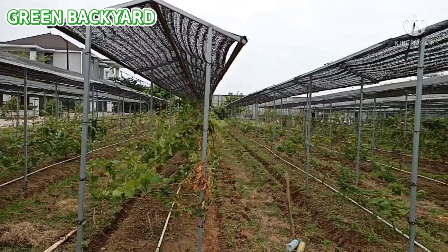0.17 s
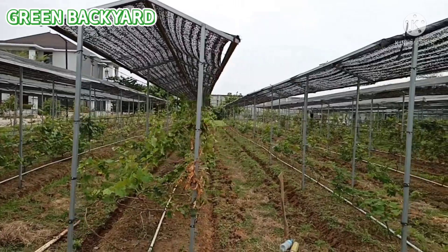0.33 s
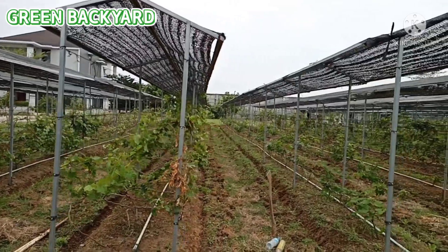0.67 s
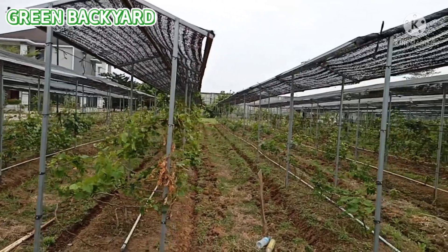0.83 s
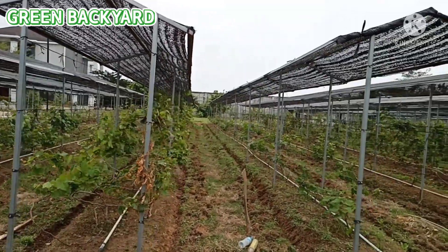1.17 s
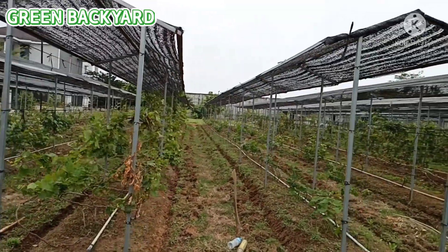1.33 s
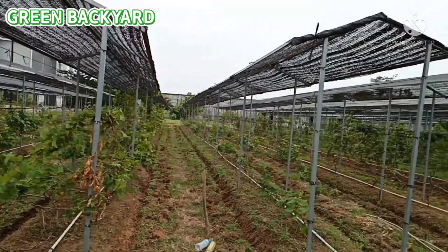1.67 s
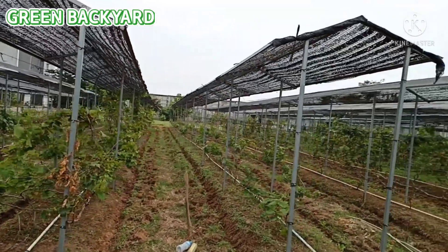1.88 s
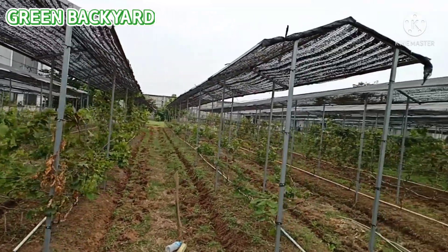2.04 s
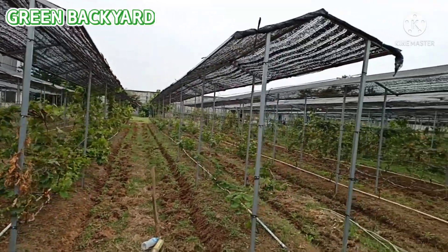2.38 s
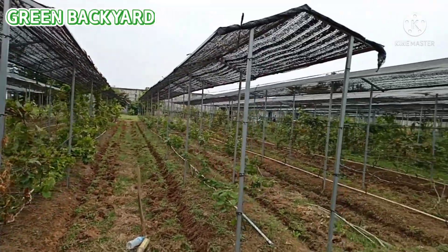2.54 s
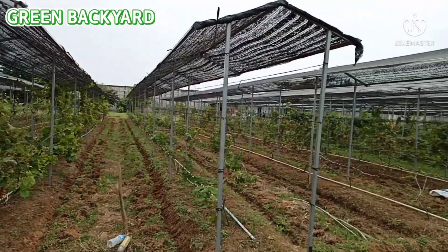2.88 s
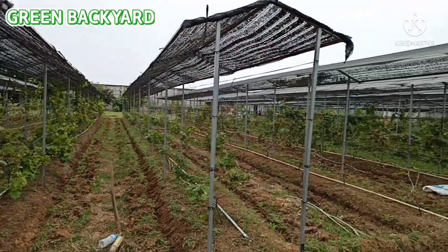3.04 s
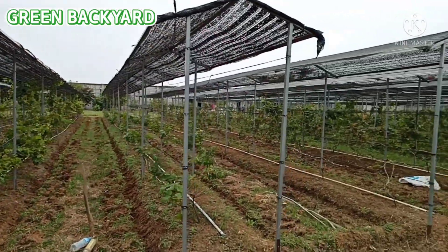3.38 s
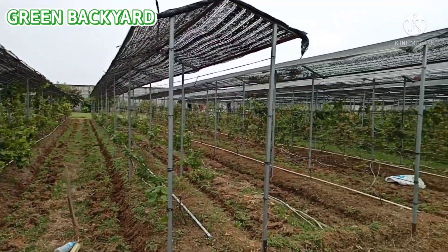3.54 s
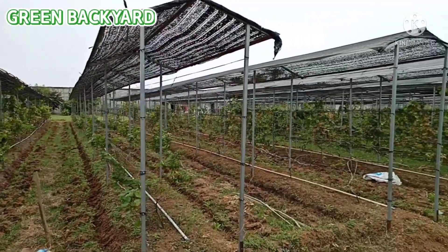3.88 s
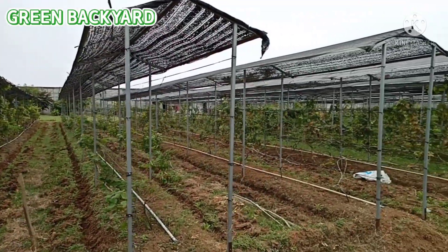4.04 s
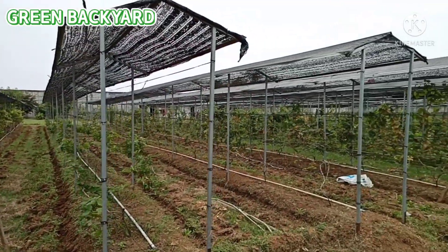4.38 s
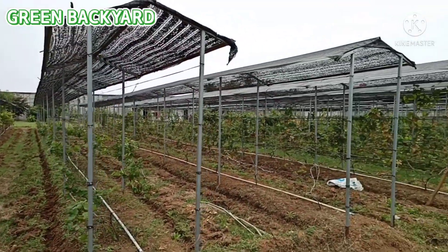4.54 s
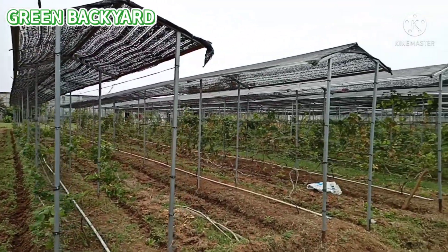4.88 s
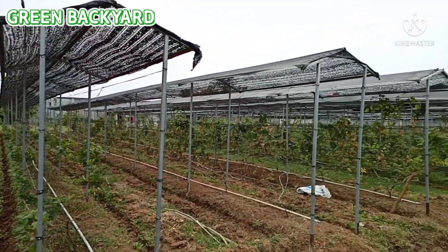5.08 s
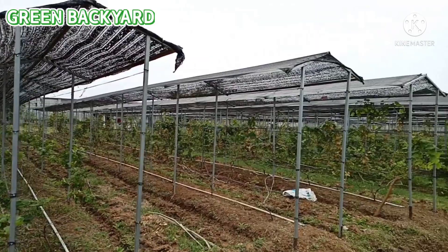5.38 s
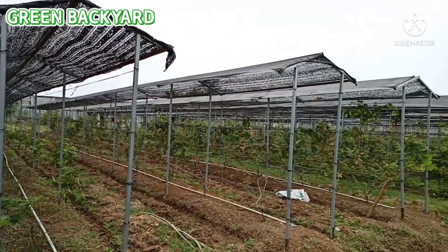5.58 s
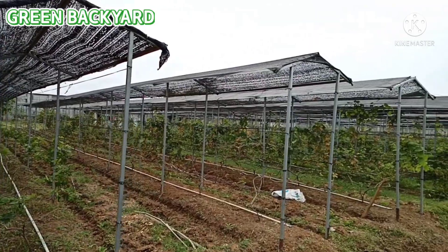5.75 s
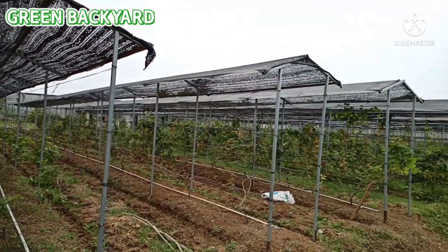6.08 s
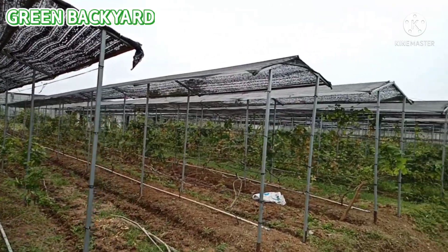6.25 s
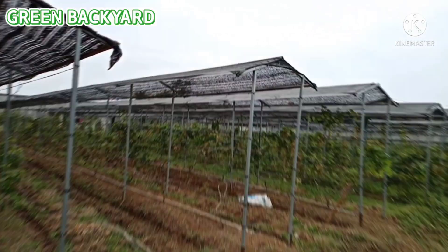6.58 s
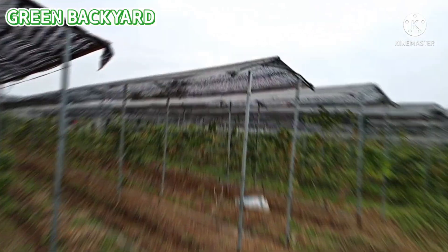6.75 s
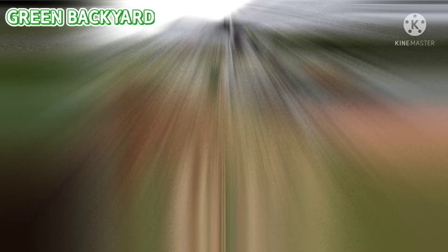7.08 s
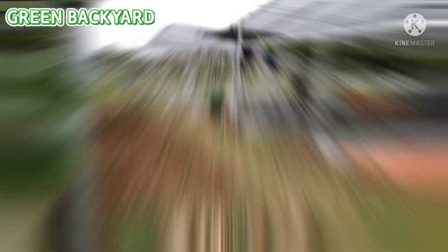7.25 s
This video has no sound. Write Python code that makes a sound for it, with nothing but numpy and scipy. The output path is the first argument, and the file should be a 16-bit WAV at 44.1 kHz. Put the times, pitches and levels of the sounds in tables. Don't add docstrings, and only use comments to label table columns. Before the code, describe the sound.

A pure, gliding bird whistle stands out over quiet open air: one three-note phrase early, another past the middle, then a rapid, softer chatter. Between them a distant bird chirps evenly, with slurred calls and brief finger ticks on the device case. Low bumps open the scene. Everything sits near the centre, with a blurred outdoor echo, light hiss and a very faint steady motor buzz.

```python
import sys
import numpy as np
from scipy import signal
from scipy.fft import rfft, irfft, next_fast_len
from scipy.io import wavfile
from scipy.ndimage import uniform_filter1d

SR = 44100
rng = np.random.default_rng(int(sys.argv[2]) if len(sys.argv) > 2 else 0)


def gain_from_db(level_db):
    decades = np.asarray(level_db, float) / 20
    return 10 ** decades


def dump_mix(stems):
    frames = np.atleast_2d(stems).T
    limited = np.clip(frames, -1, 1)
    pcm = np.round(limited * 32767).astype(np.int16)
    wavfile.write(sys.argv[1], SR, pcm)


N = 327222

# time in seconds, pitch in Hz, level in dB.
OPENERS = [
    [(0.39, 2175, -71), (0.42, 2446, -35.5), (0.486, 2650, -29.5), (0.496, 2648, -20.5),
     (0.542, 2857, -29.5), (0.552, 2761, -21), (0.69, 3048, -26.5)],
    [(4.69, 3120, -46), (4.712, 3637, -28.5), (4.78, 3512, -23.5), (4.786, 3446, -38.5), (4.862, 3449, -17),
     (4.93, 3260, -50)],
]
# start in seconds, fall in seconds, climb in seconds, lowest Hz, top Hz.
DIPS = [
    (.94, .062, .098, 1667, 1978),
    (5.04, .08, .055, 1618, 2080),
]
# start in seconds, length in seconds, pitch in Hz, drift in Hz per second, level in dB.
HELD_NOTES = [
    (1.322, 0.11, 2444, -6, -19),
    (5.356, 0.1354, 2556, -1300, -25),
]
# time in seconds, pitch in Hz, level in dB.
CHATTER = [
    [(5.737, 1162, -48), (5.765, 1504, -34.5), (5.775, 1667, -30), (5.79, 1587, -35)],
    [(5.864, 2140, -55), (5.871, 2271, -32.5), (5.886, 2230, -45), (5.896, 1850, -39)],
    [(5.942, 2175, -45), (5.949, 2307, -37.5), (5.966, 2210, -29.5), (5.975, 1710, -40.5),
     (5.99, 1220, -58)],
    [(5.99, 1154, -42), (6.03, 1134, -45), (6.045, 1060, -39)],
]
OVERTONES_DB = [-45, -51, -42.5, -37.5, -47, -40.5, -51, -38, -45, -36]
# frequency in Hz, gain in dB.
BEAK_COLOUR = [(2000, -14), (3500, 18), (4200, -7), (5400, 8.5), (8000, -6), (10000, 6.5), (11500, -4),
               (13000, -10), (15500, -15.5)]
AWAY_DB = [-1, -5, -8, -1.5, -3.5, -1.5, -7.5, 6, 3, -4.5]
# delay in seconds, level in dB.
ECHOES = [(.0063, -9), (.0113, -7), (.0173, -4.5), (.0313, -10), (.047, -15), (.0805, -11)]
# level in dB, swell in seconds, end of near walls in seconds, drop after them in dB, t60 in seconds.
GARDEN_SCATTER = (-7.5, 0.015, 0.085, -6, 1.4)
DISTANCE_SCATTER = (2.5, .002, .19, -2, 1.6)
HEDGE_SCATTER = (2.5, 0.003, .15, -1.5, 0.85)

# start in seconds, level in dB.
CHIRPS = [(1.844, -50), (2.097, -46.5), (2.337, -46.5), (2.585, -46), (2.83, -46), (3.07, -45.5),
          (4.408, -48), (5.545, -49), (7.02, -53.5)]
# seconds after the start, pitch in Hz, level in dB.
CHIRP_PARTS = [
    [(-.006, 3000, 2.5), (.006, 3222, -2.5), (.055, 3293, -11.5)],
    [(.012, 3350, 2.5), (.025, 4067, 1.5), (.045, 4396, 2.5), (.066, 4980, -6), (.09, 5260, -3.5)],
]
# start in seconds, length in seconds, start Hz, end Hz, level in dB.
SLURS = [(.59, 0.046, 3469, 4000, -55), (1.348, 0.077, 7270, 7020, -65), (1.52, 0.026, 4310, 4070, -59.5),
         (1.6, 0.066, 2590, 2976, -62.5), (1.74, .07, 2170, 1814, -57.5), (1.832, 0.043, 2347, 2500, -51.5),
         (2.595, 0.016, 2300, 1970, -56), (2.9, 0.029, 1840, 2130, -50.5), (2.925, 0.01, 850, 770, -55),
         (3.013, 0.033, 1940, 2320, -44.5), (3.034, .075, 2310, 2220, -51.5),
         (3.07, 0.058, 1585, 1785, -57.5), (3.245, .042, 3600, 3010, -48.5),
         (3.259, 0.059, 3093, 2394, -44), (3.332, .038, 2557, 1892, -47), (3.391, 0.047, 2177, 2290, -49),
         (4.758, 0.13, 1890, 2357, -56.5), (4.825, 0.086, 2106, 2690, -55),
         (4.905, 0.059, 3270, 2990, -54.5), (5.996, 0.033, 3550, 2950, -57), (6.83, .19, 3090, 2780, -67.5),
         (7.305, 0.047, 5350, 5300, -67)]
# start in seconds, end pitch in Hz, level in dB.
SEEPS = [
    (1.105, 7120, -59),
    (2.971, 6700, -65.5),
    (4.836, 6470, -60),
    (6.988, 6440, -62),
]

# start in seconds, peak in dB, ring in Hz, fade in seconds, direction of the push.
BUMPS = [
    (.152, -38, 288, 0.0043, 0.99),
    (0.227, -24, 200, 0.00093, -1.3),
    (.249, -35.5, 161, 0.012, -1.36),
    (0.256, -16, 71, 0.01, 0.75),
]
# start in seconds, peak in dB, centre in Hz, width in Hz, length in seconds.
TICKS = [(0.227, -41.5, 900, 2500, 0.00088), (2.322, -34.5, 3500, 8950, .001),
         (2.338, -46, 6500, 6000, 0.00089), (2.354, -45.5, 6500, 8030, .001),
         (2.606, -47.5, 9000, 6060, .001), (3.579, -34, 10000, 12340, 0.0014),
         (3.595, -55, 2200, 3000, 0.00235), (3.5993, -32.5, 1507, 2500, 0.0029),
         (3.6, -39, 11500, 10400, 0.0077), (3.6226, -31, 1570, 3000, 0.00091),
         (3.592, -38.5, 700, 1400, 0.023), (3.626, -30, 1790, 3480, 0.0041)]
# level in dB, centre in Hz, width in Hz.
SCRAPE = (-54, 7500, 11000)

# multiple of the motor rate, level in dB.
PUMP_PARTIALS = [(1, -9.5), (2, -2.5), (3, 0), (4, -7.5), (5, -4), (6, -4), (7, -6.5), (8, -10.5), (9, -10),
                 (10, -7.5), (11, -20.5), (12, -8.5), (13, -4.5), (14, -7), (15, -18), (16, -25.5),
                 (17, -12), (18, -6.5), (19, -10.5), (20, -8), (21, -15.5), (22, -16), (23, -15),
                 (24, -14.5), (25, -20.5), (26, -7), (30, -18.5), (34, -11.5), (35, -9.5), (38, -12),
                 (44, -12)]
# frequency in Hz, level in dB per Hz.
AIR_COLOUR = [(20, 2), (100, -7.5), (200, -12), (320, -12.5), (900, -17), (1250, -19), (1550, -16.5),
              (1900, -16), (2900, -20), (3400, -20.5), (4300, -18.5), (6000, -24.5), (10500, -27.5),
              (15500, -29)]
# frequency in Hz, level in dB per Hz.
SIDE_COLOUR = [(20, -3), (60, -2.5), (300, -7.5), (1200, -10), (2500, -18), (4500, -15), (6000, -10.5),
               (15500, -9)]

EDGE_S = .005
DIP_S, DIP_FROM_HZ = 0.17, 1995
DIP_DB, DIP_START_DB, DIP_END_DB = -30.5, -5.5, -2
TURN_TIME, TURN_PITCH = 0.37, .2
SCOOP_S, SCOOP_HZ, SCOOP_DB = .019, 65, -16
SWELL_S, SWELL_DB = .025, 6
LET_GO_S, LET_GO_HZ, LET_GO_DB = .025, 30, -16

RISE_BEND, FALL_BEND = .92, .65
SEEP_S, SEEP_HZ = .078, 7620
RUN_S, RUN_STEP_S, RUN_NOTE_S, RUN_COUNT, RUN_DB = 6.385, .0628, .036, 9, -63.5
RUN_FIRST_HZ, RUN_TOP_HZ, RUN_CLIMB_HZ_S, RUN_SLUR_HZ = 4740, 5930, 3400, 360

SCRAPE_S, SCRAPE_FADE_S = 3.58, .105
PUMP_HZ, PUMP_DB = 121.4, -66
AIR_DB, SIDE_DB = -55, -67
START_S, TOP_HZ = 0.083, 15600


def level(x, db):
    return x * gain_from_db(db) / np.sqrt(np.mean(x ** 2))


def shape(hz, points):
    f, db = np.transpose(points)
    return np.interp(np.log(np.maximum(hz, 1)), np.log(f), db)


def walk(rate):
    steps = rng.standard_normal(int(rate * N / SR) + 2)
    return 1.32 * np.interp(np.arange(N) * rate / SR, np.arange(len(steps)), steps)


def band(x, hz, width):
    b, a = signal.iirpeak(min(hz, .45 * SR), hz / width, fs=SR)
    return signal.lfilter(b, a, x)


def add(out, x, s):
    i = int(s * SR)
    out[i:i + len(x)] += x[:N - i]


def songbird():
    direct, away = np.zeros(N), np.zeros(N)
    for note, overtones_db, away_db in zip(phrases(), OVERTONES_DB, AWAY_DB):
        tone = whistle(note, overtones_db)
        add(direct, tone, note[0][0])
        add(away, tone * gain_from_db(away_db), note[0][0])
    garden = scatter(*GARDEN_SCATTER)
    for s, db in ECHOES:
        garden[int(s * SR)] += gain_from_db(db)
    return gain_from_db(-0.5) * direct + signal.fftconvolve(away, garden)[:N]


def phrases():
    notes = []
    for opener, dip_row, held_row in zip(OPENERS, DIPS, HELD_NOTES):
        notes += [opener, dip(*dip_row), held(*held_row)]
    return notes + list(CHATTER)


def dip(s, fall, climb, low_hz, top_hz):
    bottom = s + fall
    end = s + max(DIP_S, fall + climb + EDGE_S)
    turn_hz = low_hz + TURN_PITCH * (top_hz - low_hz)
    return [(s, DIP_FROM_HZ, DIP_DB + DIP_START_DB),
            (bottom, low_hz, DIP_DB),
            (bottom + TURN_TIME * climb, turn_hz, DIP_DB),
            (bottom + climb, top_hz, DIP_DB),
            (end, top_hz, DIP_DB + DIP_END_DB)]


def held(s, length, hz, drift, db):
    end_hz = hz + drift * (length - SCOOP_S - LET_GO_S)
    return [(s, hz - SCOOP_HZ, db - SWELL_DB + SCOOP_DB),
            (s + SCOOP_S, hz, db - SWELL_DB),
            (s + SCOOP_S + SWELL_S, hz + drift * SWELL_S, db),
            (s + length - LET_GO_S, end_hz, db),
            (s + length, end_hz - LET_GO_HZ, db + LET_GO_DB)]


def whistle(note, overtones_db):
    s, hz, db = np.transpose(note)
    t = np.arange(s[0], s[-1], 1 / SR)
    hz = uniform_filter1d(np.interp(t, s, hz), len(t) // 6, mode="nearest")
    phase = 2 * np.pi * np.cumsum(hz) / SR
    tone = np.sin(phase)
    flicker = rng.standard_normal((10, 32))
    for k in range(2, 10):
        patch_db = 5.5 * np.interp((t - s[0]) * 90, np.arange(32), flicker[k])
        overtone = gain_from_db(overtones_db + patch_db + shape(k * hz, BEAK_COLOUR)) * np.sin(k * phase)
        tone = tone + (k * hz < SR / 3) * overtone
    to_edge = np.minimum(t - s[0], s[-1] - t)
    edges = np.sin(np.pi / 2 * np.clip(to_edge / EDGE_S, 0, 1)) ** 2
    return np.sqrt(2) * gain_from_db(np.interp(t, s, db)) * edges * tone


def scatter(db, swell_s, walls_s, drop_db, t60_s):
    t = np.arange(int(1.5 * SR)) / SR
    noise = rng.standard_normal(len(t))
    low = signal.sosfilt(signal.butter(1, 4500, fs=SR, output="sos"), noise)
    noise = low + (noise - low) * np.exp(-t / 0.16)
    swell = 1 - np.exp(-(t / swell_s) ** 2)
    tail = noise * swell * gain_from_db(-60 * t / t60_s + drop_db * (t > walls_s))
    return tail * gain_from_db(db) / np.sqrt(np.sum(tail ** 2))


def far_birds():
    hidden, behind = np.zeros(N), np.zeros(N)
    bends = 1 + .008 * rng.standard_normal((len(CHIRPS), 2))
    for (s, db), bend in zip(CHIRPS, bends):
        for part, b in zip(CHIRP_PARTS, bend):
            chirp = np.array(part) * [1, b, 1] + [0, 0, db]
            add(hidden, whistle(chirp, -63.5), s + part[0][0])
    for s, length, start_hz, end_hz, db in faint_calls():
        glide = RISE_BEND if end_hz > start_hz else FALL_BEND
        mid_hz = start_hz + (end_hz - start_hz) * glide
        call = whistle([(0, start_hz, db), (length / 2, mid_hz, db), (length, end_hz, db)], -54.5)
        add(hidden if mid_hz > 3000 and length > RUN_NOTE_S else behind, call, s)
    hedge = scatter(*HEDGE_SCATTER)
    hedge[0] = gain_from_db(-2.5)
    far = signal.fftconvolve(hidden, scatter(*DISTANCE_SCATTER))[:N]
    return far + signal.fftconvolve(behind, hedge)[:N]


def faint_calls():
    seeps = [(s, SEEP_S, SEEP_HZ, hz, db) for s, hz, db in SEEPS]
    late = RUN_STEP_S * np.arange(RUN_COUNT)
    tops = np.minimum(RUN_FIRST_HZ + RUN_CLIMB_HZ_S * late, RUN_TOP_HZ)
    run = [(RUN_S + s, RUN_NOTE_S, hz - RUN_SLUR_HZ, hz, RUN_DB) for s, hz in zip(late, tops)]
    return list(SLURS) + seeps + run


def handling():
    out = np.zeros(N)
    t = np.arange(int(.2 * SR)) / SR
    for s, db, hz, fade, push in BUMPS:
        turns = hz * (t + 0.0005 * (1 - np.exp(-t / 0.0054)))
        envelope = np.exp(-t / fade) * np.minimum(t * hz * 6, 1)
        add(out, push * gain_from_db(db) * np.sin(2 * np.pi * turns) * envelope, s)
    for s, db, hz, width, length in TICKS:
        grit = rng.standard_normal(len(t)) * np.exp(-t / length)
        burst = band(band(grit, hz, width), hz, width)
        add(out, gain_from_db(db) * burst / np.abs(burst).max(), s)
    db, hz, width = SCRAPE
    grains = rng.standard_normal(len(t)) * gain_from_db(2.4 * walk(120)[:len(t)])
    fade = np.exp(-(t / SCRAPE_FADE_S) ** 2)
    add(out, level(band(grains, hz, width), db) * fade, SCRAPE_S)
    return out


def pump():
    cycle = np.arange(1025) / 1024
    starts = rng.uniform(0, 2 * np.pi, size=48)
    wave = sum(gain_from_db(db) * np.sin(2 * np.pi * k * cycle + starts[int(k)]) for k, db in PUMP_PARTIALS)
    turns = np.cumsum(PUMP_HZ * (1 + 0.00095 * walk(2.5))) / SR
    return np.sqrt(2) * gain_from_db(PUMP_DB + .8 * walk(4)) * np.interp(turns % 1, cycle, wave)


def air(colour, db, count):
    size = next_fast_len(N)
    hz = np.fft.rfftfreq(size, 1 / SR)
    swell_db = 0.3 * walk(1.6)
    noise = rfft(rng.standard_normal(size)) * gain_from_db(shape(hz, colour)) * (hz > 12)
    place = np.log(np.maximum(hz, 20) / 20) / np.log(SR / 40) * (count - 1)
    out = 0
    for k in range(count):
        share = np.clip(1 - np.abs(place - k), 0, 1)
        out = out + irfft(noise * share, size)[:N] * gain_from_db(swell_db + 1.1 * walk(7.9))
    return level(out, db)


def scene():
    mid = songbird() + far_birds() + handling() + pump() + air(AIR_COLOUR, AIR_DB, count=8)
    side = air(SIDE_COLOUR, SIDE_DB, count=2)
    return np.array([mid + side, mid - side])


def top_cut(x):
    return signal.sosfilt(signal.butter(12, 15750, fs=SR, output="sos"), x)


def record(dry):
    cut = signal.sosfilt(signal.ellip(8, .2, 60, TOP_HZ, fs=SR, output="sos"), dry)
    mix = cut * (np.arange(N) > START_S * SR)
    return top_cut(mix)


dry = scene()
out = record(dry)
dump_mix(out)
```